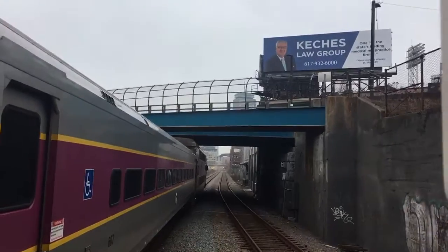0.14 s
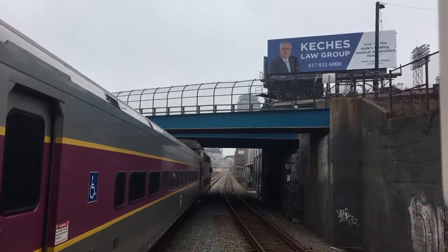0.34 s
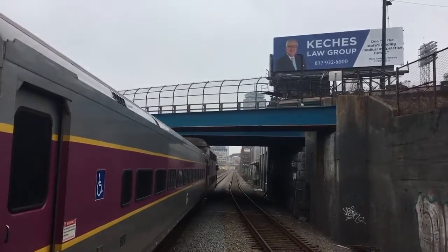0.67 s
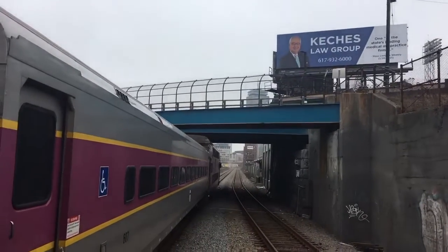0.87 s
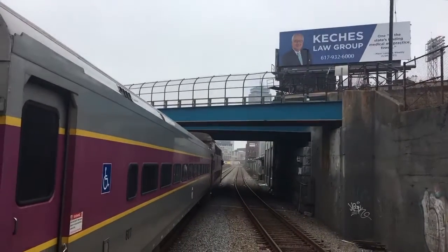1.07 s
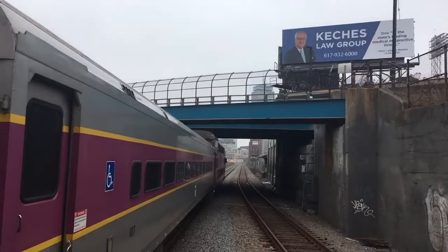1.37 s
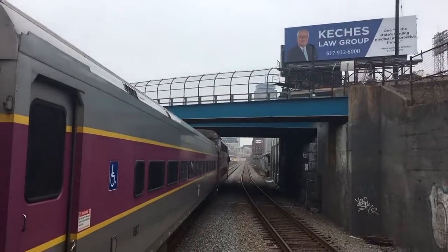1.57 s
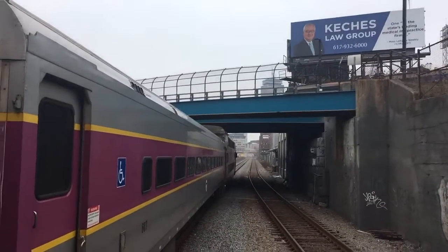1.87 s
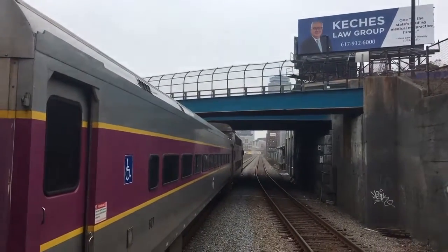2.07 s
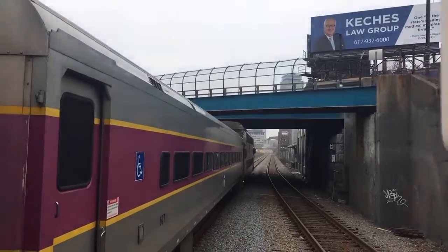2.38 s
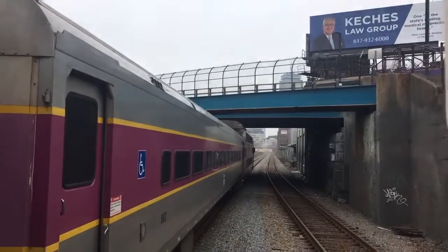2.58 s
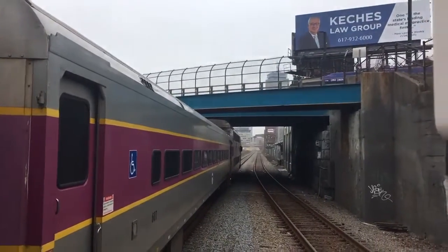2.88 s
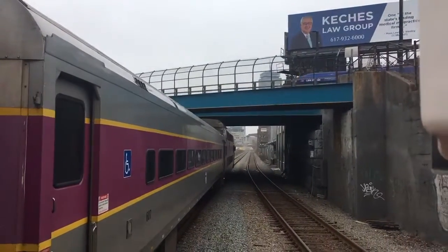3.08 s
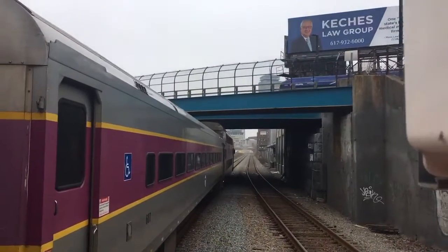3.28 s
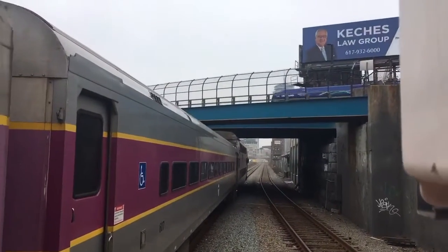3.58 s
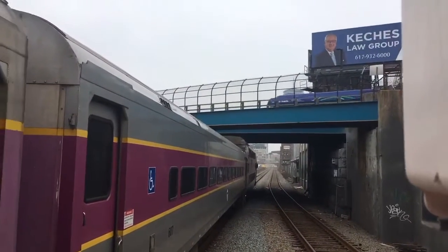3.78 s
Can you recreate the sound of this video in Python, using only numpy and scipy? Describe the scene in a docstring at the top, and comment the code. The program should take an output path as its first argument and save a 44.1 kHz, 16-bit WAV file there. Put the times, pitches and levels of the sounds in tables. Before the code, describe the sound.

A passenger train rumbles throughout, heard from one of its cars, with a low throbbing drone under the roar of wheels on rails. A faint metallic ring fades within the first second. Two faint scrapes come at 2.5 seconds. From about 2.8 to 3.3 seconds a high brake squeal falls slightly over a surge of hiss, echoing off a wall. Faint ringing lingers, and a short scrape comes at 3.9.

```python
"""A passenger train rolls beside a concrete wall, heard from one of its cars.
From the start a low drone throbs under the roar of wheels on rails; a faint metallic ring dies away.
A wheel chirps at 1.1 s; two short scrapes follow at 2.5 s. At 2.8 s a brake shoe sticks and slips:
one falling squeal, echoed by the wall, over a surge of friction hiss. The rubbed wheel rings on,
and a last scrape comes at 3.9 s."""
import sys
import numpy as np
from scipy import signal
from scipy.fft import rfft, irfft, next_fast_len
from scipy.io import wavfile

SR = 44100
rng = np.random.default_rng(int(sys.argv[2]) if len(sys.argv) > 2 else 0)


def wrap_up_sound(samples):
    """Save the sound to the file named by the first command line argument, as 16-bit audio."""
    columns = np.atleast_2d(samples).T
    # keep every value between -1 and 1, then stretch to whole-number steps
    tamed = np.clip(columns, -1, 1)
    steps = np.round(tamed * 32767).astype(np.int16)
    wavfile.write(sys.argv[1], SR, steps)


N = 173754
TIME = np.arange(N) / SR

# train boom: time_s, pitch_hz, relative_db, twin_share
BOOM = [(0, 58.9, -26, 0.51), (.8, 58.46, -25.5, 0.3), (1.05, 58.9, -28, 0.32), (1.4, 58.38, -24.5, 0.61),
        (1.8, 58.4, -23.5, 0.49), (2.05, 58.64, -24, 0.24), (2.3, 61, -30, 0.13), (2.6, 61.2, -28, .1),
        (2.75, 63, -34.5, 0.088), (2.92, 64, -19, 0.086), (3.05, 63.8, -24, .1), (3.16, 64.1, -31, .1),
        (3.27, 64.2, -19, 0.11), (3.4, 64.2, -34.5, 0.096), (3.7, 67.2, -32, 0.097), (3.85, 67.3, -24, .1),
        (3.94, 67.5, -28, .1)]
# wheel roar spectrum: freq_hz, relative_db
ROAR_SPECTRUM = [(15, -39), (24, -13), (30, -1), (40, 9), (50, 5), (90, 4), (160, 0.5), (330, -2),
                 (490, -10), (750, -5), (1000, -1), (1300, -5), (1800, -7), (2300, -15), (2900, -22.5),
                 (3400, -22.5), (4800, -34), (6200, -38), (7600, -47), (9000, -50), (10400, -56),
                 (11500, -55), (15500, -62)]
# wheel roar envelope: time_s, relative_db
ROAR_ENVELOPE = [(0.0, -22.5), (0.01, -30), (0.08, -30), (0.41, -29), (0.46, -30.5), (3.77, -30.5),
                 (3.8, -30.5), (3.94, -30)]
# wheel and body resonances: freq_hz, width_hz, relative_db
BODY_MODES = [(397, 24, -52), (933.6, 39, -46.5)]
# brake squeal: time_s, pitch_hz, level_db, overtones_relative_db
SQUEAL = [(2.835, 3870, -64, -34), (2.855, 3860, -38.5, -29), (2.877, 3780, -32, -21),
          (2.91, 3767, -36, -15), (2.925, 3726, -28.5, -21), (2.956, 3700, -25, -22),
          (3.012, 3706, -23, -27), (3.04, 3653, -26.5, -16.5), (3.08, 3650, -36, -17),
          (3.125, 3595, -30.5, -33), (3.155, 3630, -39, -31), (3.175, 3606, -55, -26),
          (3.2, 3633, -36.5, -33), (3.225, 3600, -56, -32), (3.28, 3610, -51, -34), (3.32, 3670, -64, -32),
          (3.36, 3625, -50, -34), (3.41, 3623, -66, -32)]
# squeal overtones: multiple, onset_relative_db, fade_db_per_s
SQUEAL_OVERTONES = [(2, 2, 8), (3, -3, 24), (4, -20, 15)]
# tone above the boom: time_s, pitch_hz, relative_db
UPPER_TONE = [(0, 70, -40.5), (1.9, 72.56, -40.5), (2.3, 75.57, -32), (2.65, 77.4, -31),
              (2.85, 77.7, -41.5), (3.4, 81.46, -41), (3.7, 83, -37), (3.94, 84.7, -28)]
# hum that comes and goes: time_s, pitch_hz, level_db
HUM = [(0, 270, -37.5), (.6, 272, -48), (1.3, 270, -42), (1.8, 272, -44.5), (2.15, 262, -45),
       (2.55, 263, -38), (2.8, 268, -43), (3.05, 269, -48.5), (3.3, 271, -43.5), (3.75, 274, -36),
       (3.94, 276, -45.5)]
# low rumble: time_s, level_db
RUMBLE_ENVELOPE = [(0, -47), (1.4, -39), (2.2, -46), (3.1, -51), (3.94, -39)]
# opening metallic ring: freq_hz, level_db
RING_PARTIALS = [(404, -47), (619, -51), (937, -41), (1523, -50), (1685, -53), (1873, -44.5), (1915, -48),
                 (2293, -54), (2676, -56), (2830, -62), (3138, -59), (3330, -61), (3480, -62), (3850, -66),
                 (4204, -69), (5351, -73), (5800, -75), (6150, -76)]
# friction noise around that ring: freq_hz, relative_db
RUB_SPECTRUM = [(900, -25), (2000, -15), (3100, 5), (4500, -9), (6000, -10), (7500, -20), (9000, -25),
                (11000, -53)]
# ringing of the braked wheel: time_s, level_db
WHEEL_ENVELOPE = [(2.85, -80), (3.0, -41), (3.22, -52), (3.32, -63), (3.48, -62), (3.57, -56), (3.7, -54),
                  (3.74, -67), (3.82, -58), (3.94, -62)]
# brake shoe friction spectrum: freq_hz, relative_db
SHOE_SPECTRUM = [(2000, -17), (3300, 4), (4500, -2), (6300, 0.5), (8000, -5), (9600, -3), (10500, -10.5),
                 (11800, -5), (12800, -10), (15500, -20)]
# brake shoe hiss: time_s, level_db
HISS_ENVELOPE = [(0, -108), (1.6, -81), (2.2, -69.5), (2.86, -65.5), (2.9, -56), (2.95, -46.5),
                 (3.03, -45.5), (3.17, -51.5), (3.3, -55), (3.55, -59.5), (3.94, -62)]
# scrapes: start_s, rise_s, decay_s, level_db
SCRAPES = [(2.5, .022, .025, -56), (2.53, 0.015, 0.014, -52), (3.898, 0.007, .02, -41)]
# wheel chirp partials: start_hz, peak_db
CHIRP_PARTIALS = [(8000, -65), (12000, -68)]
# echoes off wall and bridge abutment: delay_s, gain_db
ECHOES = [(.023, -16), (.085, -16)]


def boom(beat_hz=4.78, first_dip_s=0.205, shake=0.21, trim_db=-1.5):
    """Two close low tones beat until one takes over."""
    pitch_hz = follow(BOOM)
    phase = phase_rad(pitch_hz) + 2 * np.pi * rng.random()
    twin = follow(BOOM, 3) * np.sin(phase + 2 * np.pi * beat_hz * (TIME - first_dip_s))
    pair = np.sqrt(2) * (np.sin(phase) - twin)
    return amp(follow(BOOM, 2) + trim_db) * (pair + shake * resonance(pitch_hz, width_hz=24))


def rolling(roar_db=-29.5, flutter_db=0.62):
    """Wheels roar on the rails and shake wheel and body resonances."""
    envelope = unit_rms(amp(follow(ROAR_ENVELOPE) + flutter_db * wander(14.4)))
    modes = sum(amp(db) * resonance(hz, width_hz) for hz, width_hz, db in BODY_MODES)
    return envelope * (amp(roar_db) * shaped_noise(ROAR_SPECTRUM) + modes)


def brake_squeal(jitter_hz=7, flicker_db=1.93, overtone_flicker_db=3):
    """Shoe sticks and slips on the wheel: one sagging tone, overtones fading first."""
    start_s, end_s = SQUEAL[0][0], SQUEAL[-1][0]
    age_s = np.maximum(TIME - start_s, 0)
    phase = phase_rad(follow(SQUEAL) + jitter_hz * wander(70))
    envelope = amp(follow(SQUEAL, 2) + flicker_db * wander(70)) * (TIME > start_s) * (TIME < end_s)
    overtones = 0
    for multiple, onset_db, fade_db_per_s in SQUEAL_OVERTONES:
        gain = amp(onset_db - fade_db_per_s * age_s + overtone_flicker_db * wander(40))
        overtones += gain * np.sin(multiple * phase)
    return np.sqrt(2) * envelope * (np.sin(phase) + amp(follow(SQUEAL, 3)) * overtones)


def throb(table, shake, width_hz, trim_db=0):
    """A low tone beats irregularly against narrow noise at its own pitch."""
    pitch_hz = follow(table)
    tone = np.sqrt(2) * np.sin(phase_rad(pitch_hz) + 2 * np.pi * rng.random())
    return amp(follow(table, 2) + trim_db) * unit_rms(tone + shake * resonance(pitch_hz, width_hz))


def rumble(centre_hz=140.7, width_hz=59):
    """Soft low noise swells, recedes and returns."""
    return amp(follow(RUMBLE_ENVELOPE)) * resonance(centre_hz, width_hz)


def metal_ring(hold_s=0.38, fade_db_per_s=71, shake=0.7, width_hz=30, rub_db=-53):
    """Rough metallic partials in friction noise hold, then die away."""
    envelope = amp(-fade_db_per_s * np.maximum(TIME - hold_s, 0))
    partials = 0
    for hz, db in RING_PARTIALS:
        tone = np.sqrt(2) * np.sin(phase_rad(hz))
        partials += amp(db) * unit_rms(tone + shake * resonance(hz, width_hz))
    return envelope * (partials + amp(rub_db) * shaped_noise(RUB_SPECTRUM))


def wheel_ring(pitch_hz=3780, width_hz=15):
    """The rubbed wheel sings at its own pitch, outlasting the squeal."""
    envelope = amp(follow(WHEEL_ENVELOPE)) * (TIME > WHEEL_ENVELOPE[0][0])
    return envelope * resonance(pitch_hz, width_hz)


def brake_hiss(grain_db=0.8):
    """Shoe friction noise, surging with the squeal."""
    return amp(follow(HISS_ENVELOPE) + grain_db * wander(150)) * shaped_noise(SHOE_SPECTRUM)


def scrapes(grain_db=2):
    """Brief gritty bursts of shoe friction."""
    envelope = 0
    for start_s, rise_s, decay_s, db in SCRAPES:
        attack = np.clip((TIME - start_s) / rise_s, 0, 1)
        decay = np.exp(-np.maximum(TIME - start_s - rise_s, 0) / decay_s)
        envelope += amp(db) * attack * decay
    return envelope * amp(grain_db * wander(250)) * shaped_noise(SHOE_SPECTRUM)


def wheel_chirp(start_s=1.14, length_s=0.18, pitch_rise=0.085, width_hz=520):
    """Two thin, rough partials glide upward."""
    progress = np.clip((TIME - start_s) / length_s, 0, 1)
    glide = 1 + pitch_rise * progress
    partials = sum(amp(db) * resonance(hz * glide, width_hz) for hz, db in CHIRP_PARTIALS)
    return np.sin(np.pi * progress) ** 2 * partials


def wall(direct, tail_db=-15.5, t60_s=0.83):
    """Direct sound, two echoes and a diffuse tail between wall and train."""
    lag_s = TIME[:SR]
    response = rng.standard_normal(SR) * amp(-60 * lag_s / t60_s) * (lag_s > ECHOES[0][0])
    tail = signal.fftconvolve(direct, response / np.linalg.norm(response))[:N]
    echoes = sum(amp(db) * np.pad(direct, (round(delay_s * SR), 0))[:N] for delay_s, db in ECHOES)
    return direct + echoes + amp(tail_db) * tail


def amp(db):
    """Decibels to gain."""
    return 10 ** (np.asarray(db) / 20)


def unit_rms(x):
    """Scale to rms 1."""
    return x / np.sqrt(np.mean(x ** 2) + 1e-20)


def follow(table, column=1):
    """One column of a time table, interpolated per sample."""
    rows = np.array(table)
    return np.interp(TIME, rows[:, 0], rows[:, column])


def shaped_noise(spectrum):
    """Noise with the given spectrum, rms 1."""
    hz, db = np.transpose(spectrum)
    bins_hz = np.fft.rfftfreq(N, 1 / SR)
    gain = amp(np.interp(np.log(bins_hz + 1), np.log(hz), db))
    return unit_rms(irfft(rfft(rng.standard_normal(N)) * gain, N))


def wander(rate_hz):
    """Smooth random motion up to about rate_hz, rms 1."""
    size = next_fast_len(N)
    bins_hz = np.fft.rfftfreq(size, 1 / SR)
    spectrum = rfft(rng.standard_normal(size)) / (1 + (bins_hz / rate_hz) ** 4)
    return unit_rms(irfft(spectrum, size)[:N])


def phase_rad(hz):
    """Running phase of a pitch or pitch curve."""
    return 2 * np.pi * np.cumsum(hz * np.ones(N)) / SR


def resonance(hz, width_hz):
    """Randomly shaken resonance: a fuzzy tone, rms 1."""
    phase = phase_rad(hz)
    return unit_rms(wander(width_hz / 2) * np.cos(phase) + wander(width_hz / 2) * np.sin(phase))


def scene():
    """Running train and brake, mono; only squeal and chirp echo."""
    drone = boom() + rumble()
    drone += throb(UPPER_TONE, shake=0.35, width_hz=15, trim_db=2)
    drone += throb(HUM, shake=1.3, width_hz=17)
    wheels = rolling() + metal_ring() + wheel_ring()
    friction = brake_hiss() + scrapes()
    return (drone + wheels + friction + wall(brake_squeal() + wheel_chirp()))[None]


def record(dry, fade_s=0.004, cutoff_hz=15700):
    """Fade both ends, then low-pass."""
    fade = np.minimum(np.minimum(TIME, TIME[::-1]) / fade_s, 1)
    lowpass = signal.firwin(511, cutoff_hz, window=("kaiser", 9), fs=SR)
    return signal.oaconvolve(dry * fade, lowpass[None], "same")


dry = scene()
out = record(dry)
wrap_up_sound(out)
```